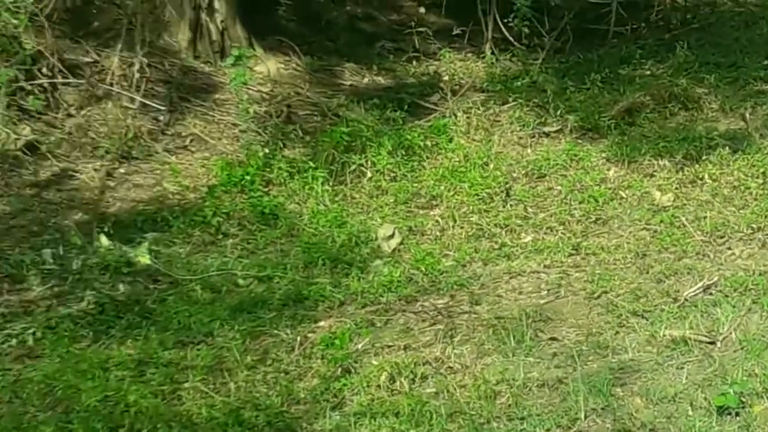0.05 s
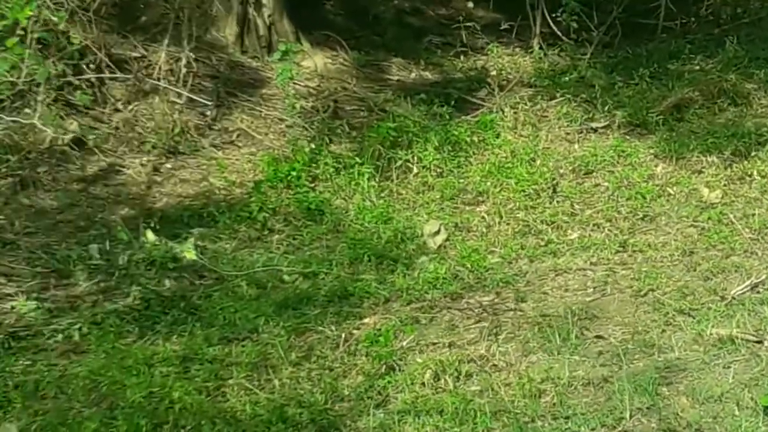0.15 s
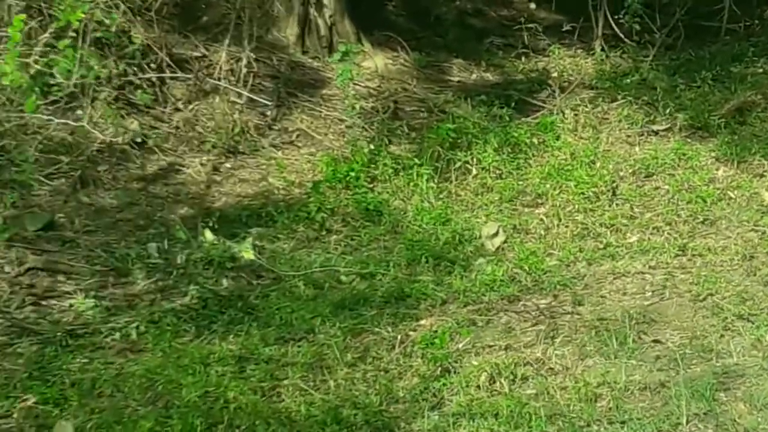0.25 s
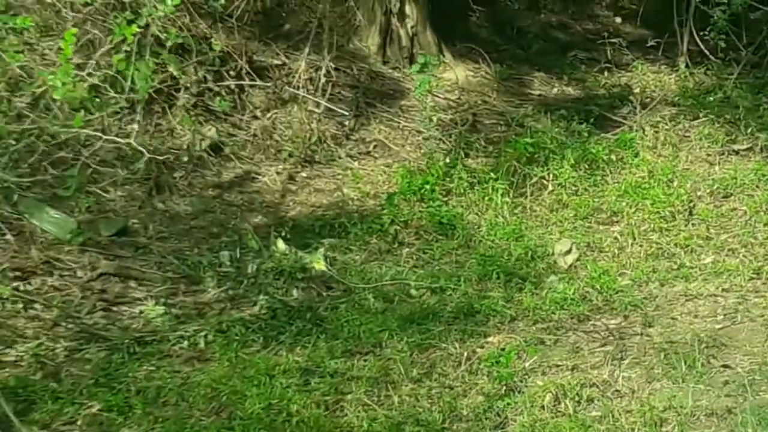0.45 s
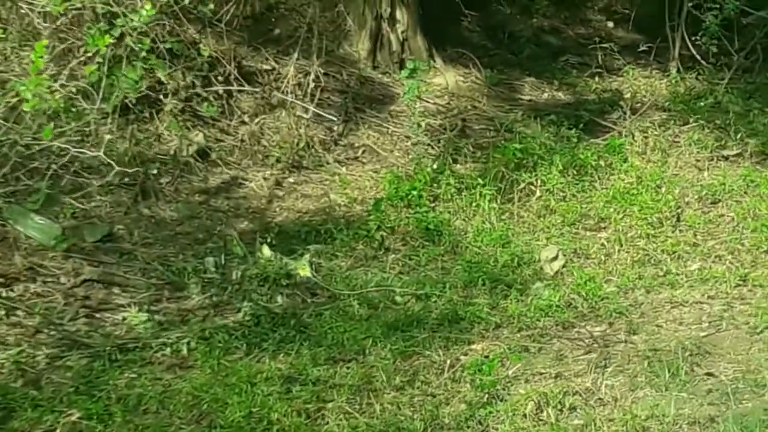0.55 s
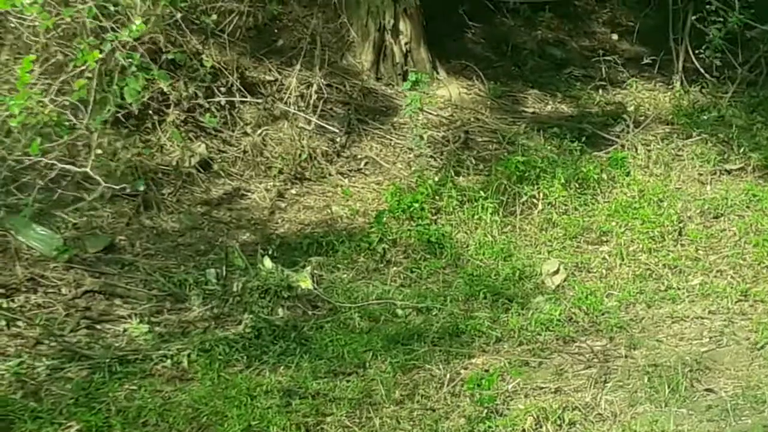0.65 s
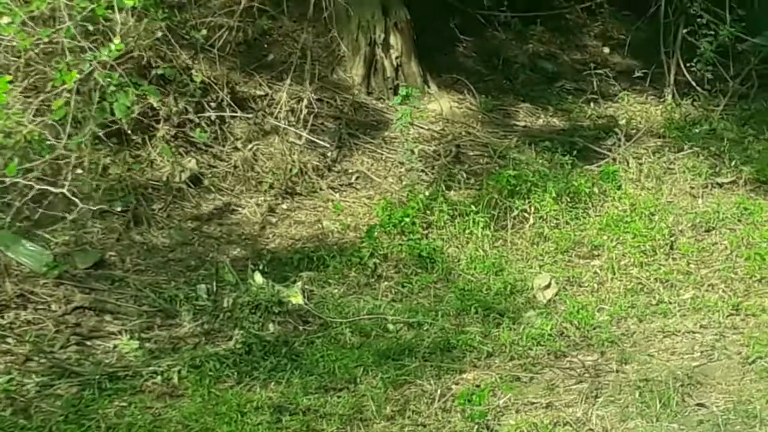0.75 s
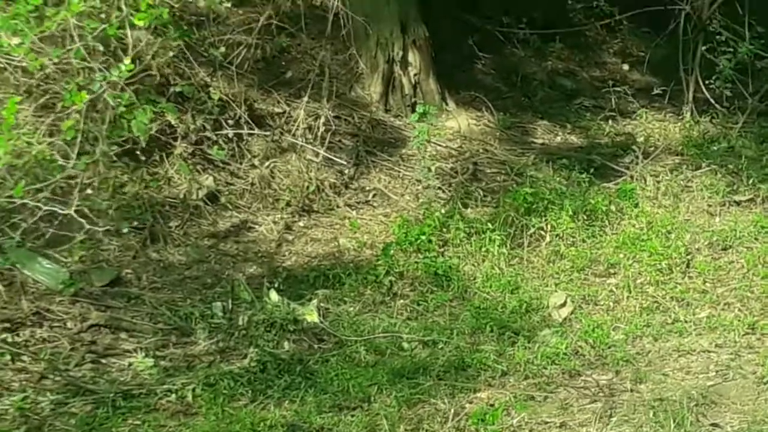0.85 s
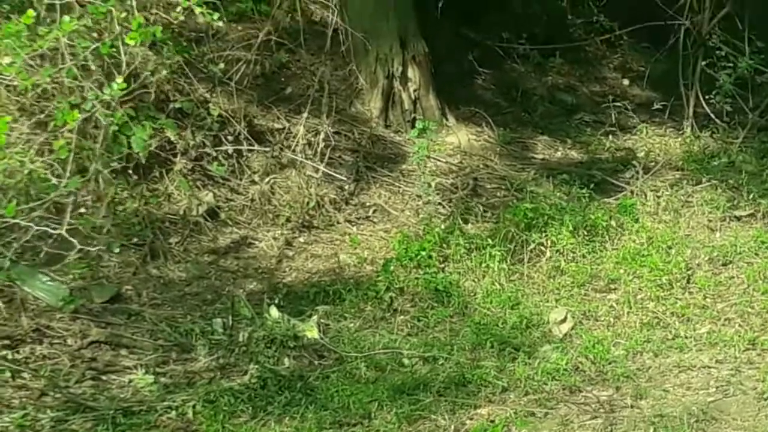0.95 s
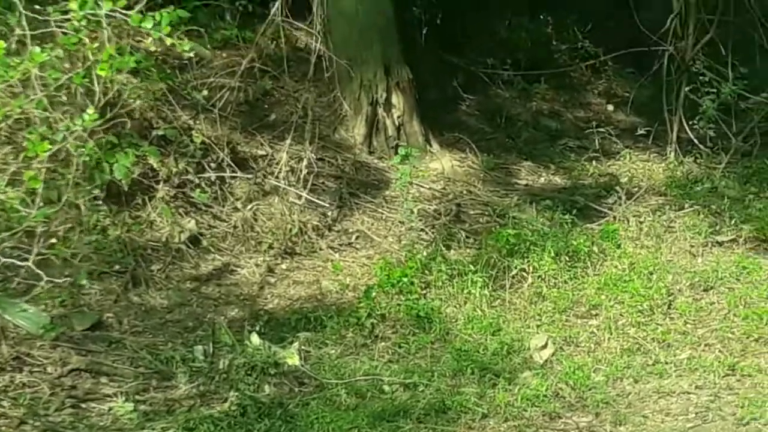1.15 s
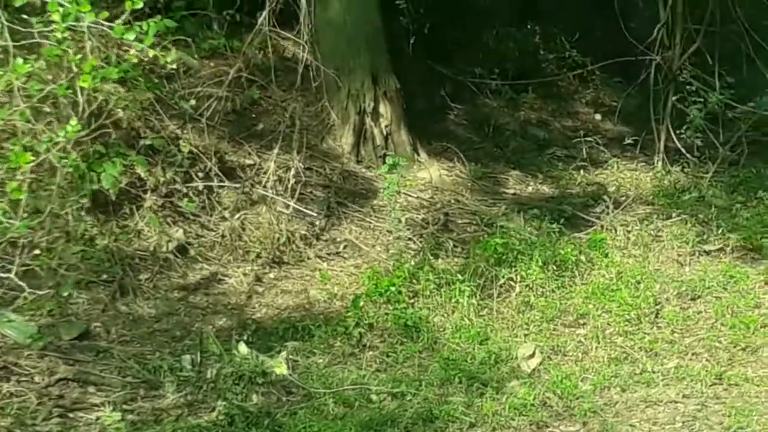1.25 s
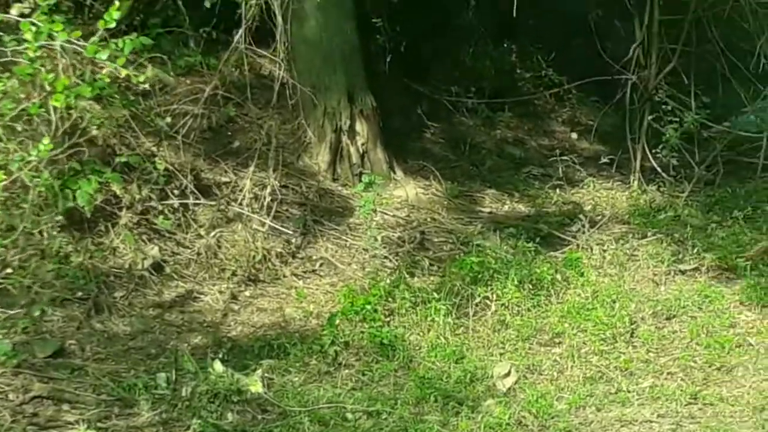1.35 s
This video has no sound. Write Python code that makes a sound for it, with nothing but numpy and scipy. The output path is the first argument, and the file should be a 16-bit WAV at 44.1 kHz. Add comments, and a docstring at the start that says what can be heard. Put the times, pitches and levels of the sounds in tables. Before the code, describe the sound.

Close, crackly rustling of brush builds to two quick, sharp twig snaps, then dies away into soft grass scuffs. Small birds twitter faintly at the wooded edge of a clearing, over insects and a light hiss.

```python
"""Rustling brush beside a clearing.

Close by, dry leaves rustle in dense clicks, stems tick, two twigs snap and the grass is softly scuffed.
Small birds whistle and twitter among the trees; insects drone faintly over hiss and a low rumble of air.
The right microphone is louder in the mids and has a deep notch in the treble."""
import sys
import numpy as np
from scipy import signal
from scipy.fft import rfft, irfft, next_fast_len
from scipy.io import wavfile

SR = 44100
rng = np.random.default_rng(int(sys.argv[2]) if len(sys.argv) > 2 else 0)


def to_wav(sig):
    """Store sig (one row per channel, or 1-D mono) as 16-bit WAV at the path in sys.argv[1].

    Samples outside -1..1 are clipped; the rate is SR.
    """
    pcm = np.clip(np.atleast_2d(sig), -1, 1) * 32767
    pcm = np.round(pcm).astype(np.int16)
    wavfile.write(sys.argv[1], SR, pcm.T)  # frames by channels


N = 61739
T = np.arange(N) / SR
FFT_SIZE = next_fast_len(2 * N)
AMBIENT_LIKENESS = 0.54   # left-right correlation


def from_db(db):
    """Decibels to gain."""
    return 10 ** (np.asarray(db) / 20)


def colour(x, points):
    """Minimum-phase filter following (frequency [Hz], gain [dB]) points."""
    hz, db = np.transpose(points)
    bins_hz = np.fft.rfftfreq(FFT_SIZE, 1 / SR)
    gain = from_db(np.interp(np.log(bins_hz + 1), np.log(hz), db))
    cepstrum = irfft(np.log(gain), FFT_SIZE)
    cepstrum[1:FFT_SIZE // 2] *= 2
    cepstrum[FFT_SIZE // 2 + 1:] = 0
    return irfft(rfft(x, FFT_SIZE) * np.exp(rfft(cepstrum)), FFT_SIZE)[..., :N]


def band(x, hz, width_hz):
    """Band-pass: two coupled resonances around a pitch."""
    low_hz = np.sqrt(hz ** 2 + (width_hz / 2) ** 2) - width_hz / 2
    sos = signal.butter(2, [low_hz, low_hz + width_hz], "band", fs=SR, output="sos")
    return signal.sosfilt(sos, x + 1e-18)


def drift(cutoff_hz):
    """Low-passed noise of unit spread."""
    sos = signal.butter(2, cutoff_hz, fs=SR, output="sos")
    slow = signal.sosfilt(sos, rng.standard_normal(2 * N))[N:]
    return slow / slow.std()


def stereo(pair, likeness):
    """Two independent signals mixed to left and right with the given correlation."""
    mid = np.sqrt((1 + likeness) / 2) * pair[0]
    side = np.sqrt((1 - likeness) / 2) * pair[1]
    return np.array([mid + side, mid - side])


def white(likeness):
    """Stereo noise at 0 dB per Hz."""
    return stereo(rng.standard_normal((2, N)), likeness) * np.sqrt(SR / 2)


def scatter(x, t60_s):
    """Dense reflections from leaves and trunks, different on each side."""
    tail = white(likeness=.5) * from_db(-60 * T / t60_s)
    tail /= np.sqrt(np.sum(tail ** 2, axis=1, keepdims=True))
    return signal.fftconvolve(x[None], tail, axes=1)[:, :N]


# Background hiss: (frequency [Hz], density [dB per Hz])
BACKGROUND_HISS_SPECTRUM = [(30, -114), (150, -104), (280, -108), (570, -107), (790, -114), (1080, -109),
                            (1450, -115), (2800, -117), (4200, -116), (5200, -113), (6500, -106),
                            (8750, -104), (9250, -120), (12000, -123), (16000, -124)]


def background_hiss():
    """Steady background hiss, cut sharply above 9 kHz by the recorder."""
    return colour(white(AMBIENT_LIKENESS), BACKGROUND_HISS_SPECTRUM)


# Rumble colour: (frequency [Hz], gain [dB])
RUMBLE_SPECTRUM = [(20, -42), (36, -23.5), (52, -5), (65, 3.5), (90, -8), (130, -10), (190, -31),
                   (400, -54.5)]
# Rumble envelope: (time [s], level [dB])
RUMBLE_ENVELOPE = [(0, -80), (.14, -76), (.22, -85), (.44, -77.5), (.57, -85.5), (.71, -75.5), (.78, -92.5),
                   (.92, -82), (1.17, -89), (1.22, -79), (1.4, -80.5)]


def rumble():
    """A low, heaving rumble of air."""
    level_db = np.interp(T, *np.transpose(RUMBLE_ENVELOPE))
    return from_db(level_db) * colour(white(likeness=.97), RUMBLE_SPECTRUM)


# Insect drones: (centre [Hz], width [Hz], start level [dB], end level [dB])
INSECT_DRONES = [(1980, 250, -72.5, -83), (7730, 420, -66, -74)]


def insects(flutter_db=1.8, flutter_hz=29):
    """Many distant insects merge into narrow bands that flutter and slowly fade."""
    out = 0
    for hz, width_hz, start_db, end_db in INSECT_DRONES:
        drone = band(white(AMBIENT_LIKENESS), hz, width_hz)
        level_db = np.linspace(start_db, end_db, N) + flutter_db * drift(flutter_hz)
        out = out + from_db(level_db) * drone / drone.std()
    return out


def bird_notes(rows, warble, warble_hz, bend=0, fade_db=3.5):
    """Sines gliding along a parabola; random warble and bend are fractions of the pitch."""
    out = np.zeros(N)
    for start_s, length_s, db, *pitches_hz in rows:
        progress = np.clip((T - start_s) / length_s, 0, 1)
        glide_hz = np.polyval(np.polyfit([0, .5, 1], pitches_hz, 2), progress)
        hz = glide_hz * (1 + warble * drift(warble_hz) + bend)
        arch = np.sqrt(2 * np.abs(np.sin(np.pi * progress)))
        envelope = from_db(db + fade_db * (1 - progress)) * arch
        out += envelope * np.sin(2 * np.pi * np.cumsum(hz) / SR)
    return out


# Nearer whistles: (start [s], length [s], level [dB], start pitch [Hz], mid pitch [Hz], end pitch [Hz])
BIRD_WHISTLES = [(.05, 0.089, -71, 3805, 4200, 4120), (.115, .11, -69.5, 4115, 3673, 3630),
                 (.37, 0.13, -72.5, 4125, 4000, 3760), (.41, .12, -82.5, 2700, 2570, 2460),
                 (.52, 0.12, -68.5, 4240, 4450, 4280), (.615, .12, -68, 3936, 3670, 3570),
                 (1.347, .08, -75, 2390, 2200, 2150)]
# Far rising runs: (start [s], length [s], level [dB], start pitch [Hz], mid pitch [Hz], end pitch [Hz])
BIRD_TWITTERS = [(.74, 0.17, -73, 3804, 4200, 4294), (.78, 0.15, -68, 4890, 5700, 6040),
                 (1.065, 0.15, -75, 3960, 4050, 4404), (1.125, 0.073, -69, 4965, 5000, 5300),
                 (1.15, 0.12, -70, 6340, 6700, 6720), (1.34, 0.033, -76, 4020, 4300, 5000)]


def birds(trill_hz=25, trill_depth=0.69, trill_slide=0.0727, whistle_echo_db=-2):
    """Whistles arrive partly direct, trilled twitters only by way of the trees."""
    whistles = bird_notes(BIRD_WHISTLES, warble=0.018, warble_hz=260)
    trill_phase = 2 * np.pi * trill_hz * T
    down_flick = -trill_slide * signal.sawtooth(trill_phase)
    twitters = bird_notes(BIRD_TWITTERS, warble=0.076, warble_hz=280, bend=down_flick)
    twitters *= 1 - trill_depth * np.cos(trill_phase)
    return whistles + scatter(from_db(whistle_echo_db) * whistles + twitters, t60_s=0.3)


# Scuffs in the grass: (peak time [s], spread [s], level [dB])
GRASS_SCUFFS = [(0.866, 0.06, -99), (1.17, 0.037, -104)]
# Scuff colour: (frequency [Hz], gain [dB])
SCUFF_SPECTRUM = [(90, -9), (170, 3.5), (300, -3), (560, 0.5), (800, -14.5), (1600, -14), (4000, -56)]


def grass_scuffs():
    """Scuffed grass gives soft, dull swells of noise."""
    envelope = sum(from_db(db) * np.exp(-((T - peak_s) / spread_s) ** 2 / 2)
                   for peak_s, spread_s, db in GRASS_SCUFFS)
    return envelope * colour(white(AMBIENT_LIKENESS), SCUFF_SPECTRUM)


def grains(rate_per_s, spread_db, clump_db, clump_hz=77):
    """Dense clicks of uneven size, in clumps, at 0 dB per Hz."""
    sizes = from_db(spread_db * np.minimum(rng.exponential(1, (2, N)), 4))
    signs = rng.choice([-1, 1], (2, N))
    hits = rng.random((2, N)) < rate_per_s / SR
    clicks = sizes * signs * hits * from_db(clump_db * drift(clump_hz))
    return stereo(clicks / clicks.std(), likeness=0.4) * np.sqrt(SR / 2)


# Brushes against foliage: (peak time [s], rise [s], fall [s], leaf [dB], edge [dB], litter [dB])
FOLIAGE_BRUSHES = [(.08, 0.27, 0.095, -105, -114, -116), (.214, 0.013, 0.035, -99, -90, -106),
                   (0.252, 0.051, 0.036, -97, -101, -106), (.282, 0.013, 0.013, -95.5, -102, -91),
                   (.315, 0.024, 0.034, -99, -107, -99), (0.379, 0.021, 0.034, -102, -99, -105),
                   (0.428, .03, 0.061, -102, -108, -106), (0.476, 0.013, 0.013, -96.5, -95.5, -108),
                   (0.544, 0.069, 0.055, -103, -107, -114), (.71, 0.094, 0.087, -106, -116, -120)]
# Grain of leaves, edges and litter, a row each: (rate [1/s], size spread [dB], clumping [dB])
RUSTLE_GRAINS = [(3060, 1, 2.5), (7000, 2.5, 4), (3890, 2, 2.5)]
# Colours of leaves, crisp edges and crunching litter: (frequency [Hz], gain [dB])
LEAF_SPECTRUM = [(200, -18.5), (700, -20), (1400, -2), (2000, 2), (3000, 4), (4500, 4), (6500, 3),
                 (9000, -0.5), (16000, -52.5)]
EDGE_SPECTRUM = [(1500, -33), (4500, -4), (6500, -3), (8000, 6.5), (10000, -1), (13000, 2.5), (15500, -4)]
LITTER_SPECTRUM = [(150, -30), (400, -9), (700, -0.5), (1050, 8), (1500, -14), (3000, -16.5), (8000, -21)]


def rustle():
    """Each brush swells and dies away, shaking leaves, their dry edges and the litter below."""
    out = 0
    for layer, spectrum in enumerate((LEAF_SPECTRUM, EDGE_SPECTRUM, LITTER_SPECTRUM)):
        power = 0
        for peak_s, rise_s, fall_s, *levels_db in FOLIAGE_BRUSHES:
            from_peak = np.maximum((peak_s - T) / rise_s, (T - peak_s) / fall_s)
            swell = from_db(levels_db[layer]) * np.exp(-from_peak ** 2 / 2)
            power = power + swell ** 2
        out = out + colour(grains(*RUSTLE_GRAINS[layer]) * np.sqrt(power), spectrum)
    return out


# Crack of tearing fibres: (frequency [Hz], gain [dB])
CRACK_SPECTRUM = [(100, -44), (250, -19), (500, -11.5), (1000, -7.5), (3000, -20.5), (6000, -16), (8200, 6),
                  (10500, -1.5), (12700, 7), (15500, 1.5)]


def wood_breaks(rows, fibres=4, fibre_gap_s=0.00024, fibre_loss_db=6.5, crack_lead_s=0.0002,
                ring_ratio=1.062, ring_t60_s=0.0055, bush_echo_db=-25):
    """Fibres tear in a bright crack; the stem is kicked into a few cycles and rings on briefly."""
    body, tears = np.zeros(N), np.zeros(N)
    for time_s, kick_db, hz, width_hz, crack_db, ring_db in rows:
        start = int(time_s * SR)
        t = T[:N - start]
        kick = band(signal.unit_impulse(len(t)), hz, width_hz)
        ring = np.sin(2 * np.pi * ring_ratio * hz * t) * from_db(-60 * t / ring_t60_s)
        body[start:] += from_db(kick_db) * kick / np.abs(kick).max() + from_db(ring_db) * ring
        gaps_s = fibre_gap_s * (.5 + rng.random(fibres))
        tear_s = time_s - crack_lead_s + np.cumsum(gaps_s) - gaps_s[0]
        tear_db = crack_db - fibre_loss_db * np.arange(fibres)
        tears[(tear_s * SR).astype(int)] += from_db(tear_db) * rng.choice([-1, 1], fibres)
    direct = body + colour(tears, CRACK_SPECTRUM)
    return direct + from_db(bush_echo_db) * scatter(direct, t60_s=0.073)


# Small stems: (time [s], kick [dB], pitch [Hz], width [Hz], crack [dB], ring [dB])
STEM_TICKS = [(.1125, -46, 2840, 2520, -60, -68), (.2075, -43.5, 1960, 476, -51, -44.5),
              (.2128, -61, 4500, 2000, -26, -68), (.2255, -46, 3000, 3000, -37, -59),
              (.2451, -44, 4200, 1860, -20, -64), (.2520, -48, 4030, 2500, -41, -68),
              (.2607, -29.5, 4280, 2920, -27.5, -71), (.2606, -41, 950, 440, -60, -47),
              (.2787, -39, 3880, 2960, -45, -46.5), (.3345, -64, 3080, 1800, -56, -49),
              (.3997, -33.5, 3570, 1400, -30, -48), (.4312, -42, 4000, 2200, -59, -60.5),
              (.5410, -59, 4040, 2200, -31.5, -64), (.6208, -39.5, 4400, 2000, -40, -53.5),
              (.6640, -41.5, 5400, 2510, -45, -68), (.7690, -51, 3350, 2000, -62, -52)]
# Twigs: (time [s], kick [dB], pitch [Hz], width [Hz], crack [dB], ring [dB])
TWIG_SNAPS = [(.4663, -22, 3520, 1700, -15, -33.5), (.5218, -15.5, 3235, 1200, -18.5, -34.5)]


def twigs_and_stems():
    """Two twigs break loudly amid the ticks of smaller stems."""
    return wood_breaks(TWIG_SNAPS) + wood_breaks(STEM_TICKS)


def delay_left(x, lag_s=0.00012):
    """Sound reaches the left microphone slightly later."""
    phase_shift = np.exp(-2j * np.pi * np.fft.rfftfreq(FFT_SIZE, 1 / SR) * lag_s)
    left = irfft(rfft(x[0], FFT_SIZE) * phase_shift, FFT_SIZE)[:N]
    return np.array([left, x[1]])


def scene():
    """Close brush and its background at the two microphones."""
    brush = rustle() + twigs_and_stems() + grass_scuffs()
    background = birds() + insects() + background_hiss() + rumble()
    return delay_left(brush + background)


# Right microphone relative to the left: (frequency [Hz], gain [dB])
RIGHT_MIC_RESPONSE = [(60, 4.5), (400, 4.5), (1000, 6), (2000, 8), (3100, 9.5), (4000, 12), (5000, 6),
                      (6200, -4.5), (7500, -27.5), (9500, -27), (12000, -7), (14500, -1.5), (16000, 5.5)]
MIC_HISS_DB_PER_HZ, CUTOFF_HZ = -123, 16000


def record(dry):
    """The right microphone colours the sound, both hiss faintly, and the top is cut."""
    mics = np.array([dry[0], colour(dry[1], RIGHT_MIC_RESPONSE)])
    hiss = from_db(MIC_HISS_DB_PER_HZ) * white(likeness=0)
    low_pass = signal.ellip(10, .1, 70, CUTOFF_HZ, fs=SR, output="sos")
    return signal.sosfilt(low_pass, mics + hiss)


dry = scene()
out = record(dry)
to_wav(out)
```